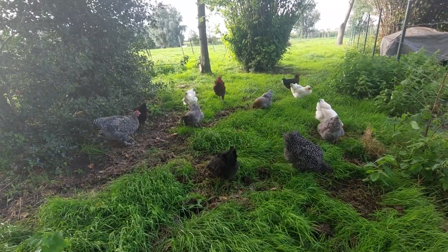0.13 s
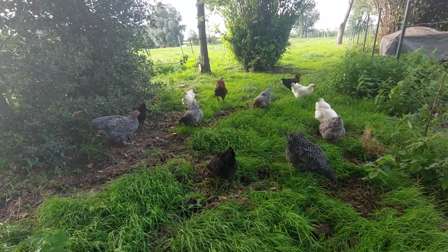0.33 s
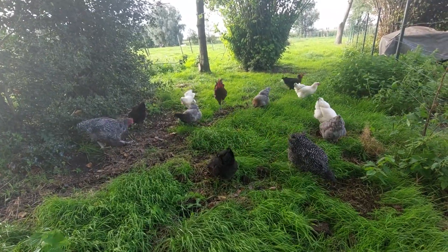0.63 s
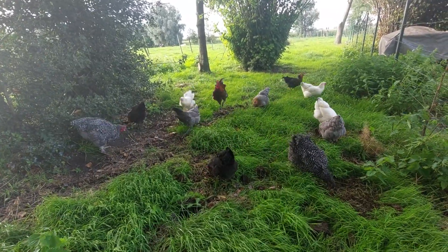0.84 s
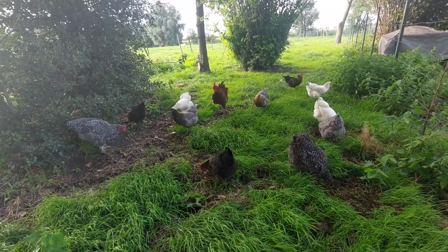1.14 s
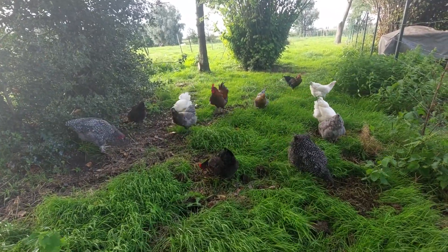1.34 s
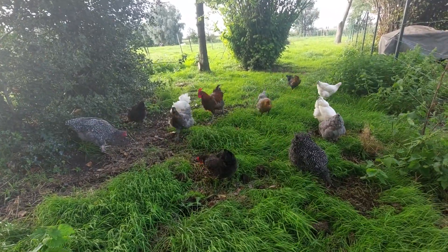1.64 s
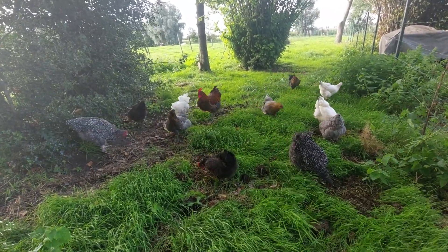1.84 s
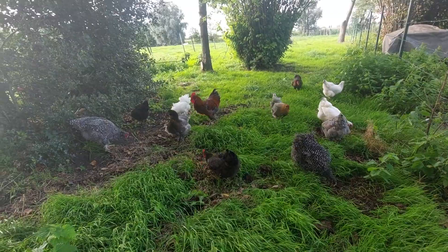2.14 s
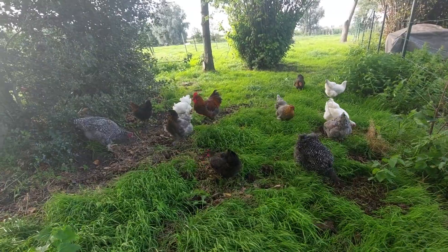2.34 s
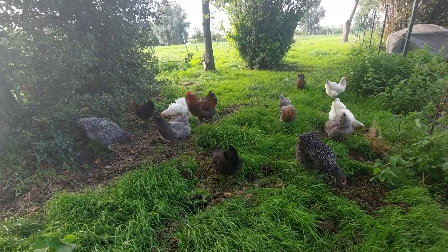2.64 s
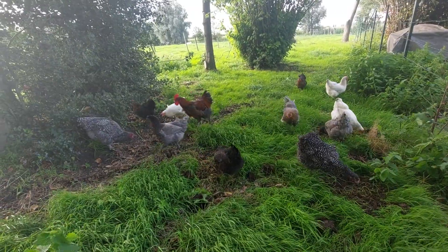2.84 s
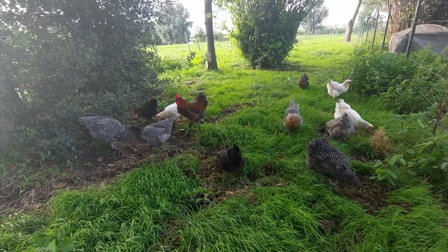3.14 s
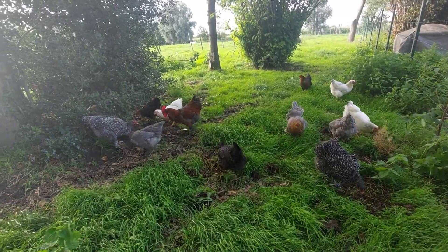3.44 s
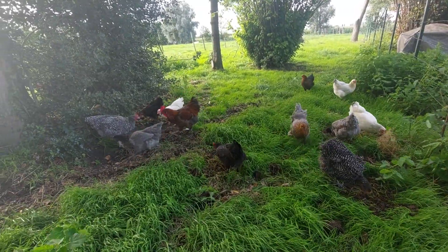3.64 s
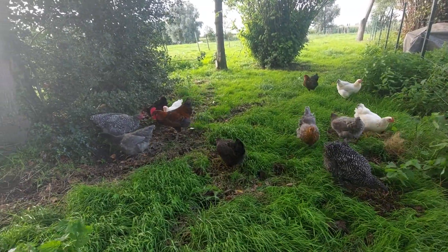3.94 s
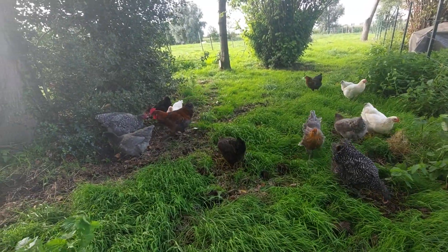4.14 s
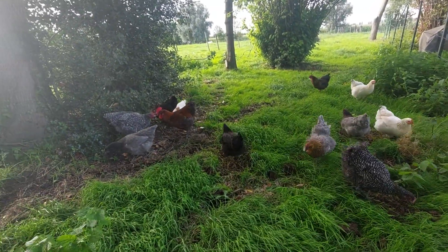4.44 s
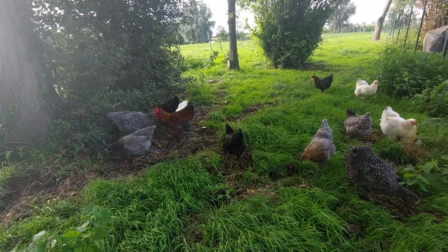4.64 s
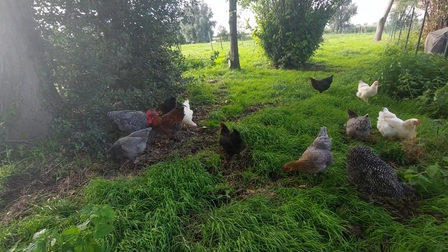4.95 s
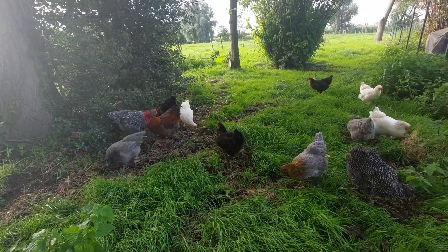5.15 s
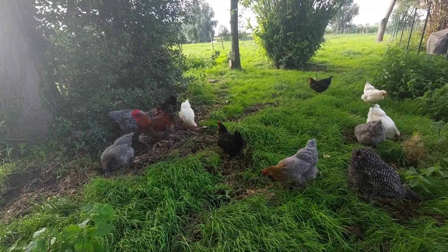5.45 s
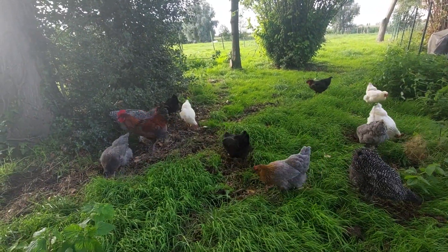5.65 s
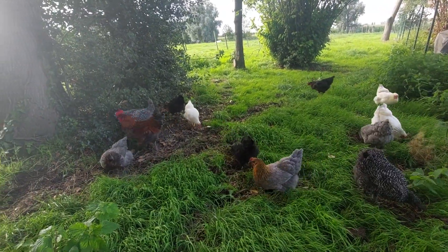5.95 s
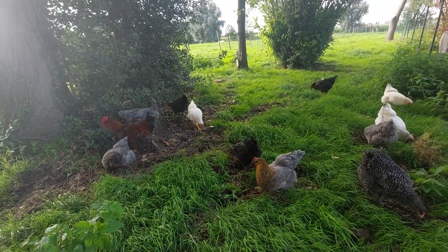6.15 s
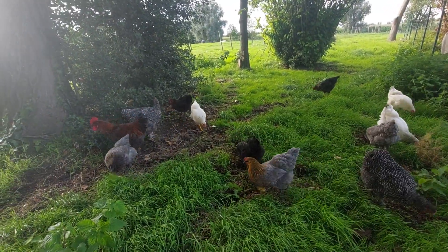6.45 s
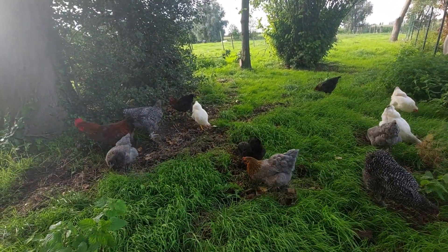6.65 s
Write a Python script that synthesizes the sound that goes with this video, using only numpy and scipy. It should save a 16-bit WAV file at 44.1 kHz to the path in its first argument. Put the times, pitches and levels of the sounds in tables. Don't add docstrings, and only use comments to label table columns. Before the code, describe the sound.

Outdoor chickens: short throaty clucks, soft hen notes, a faint whine and low croon, with dry rustling and bassy wind buffets.

```python
import sys
import numpy as np
from scipy import signal
from scipy.io import wavfile
from scipy.ndimage import uniform_filter1d

SR = 44100
rng = np.random.default_rng(int(sys.argv[2]) if len(sys.argv) > 2 else 0)


def bounce(signal):
    frames = np.transpose(np.atleast_2d(signal))
    limited = np.clip(frames, -1, 1)
    pcm = np.round(limited * 32767).astype(np.int16)
    wavfile.write(sys.argv[1], SR, pcm)


def gain_from_db(level_db):
    decades = np.asarray(level_db, float) / 20
    return 10 ** decades


N = 299350

# freq_hz, density_db (per Hz)
HUM_COLOUR = [(18, -55), (30, -19), (60, 2.5), (87, -33), (155, -15), (194, -38), (243, -11.5), (272, -13),
              (617, -12), (1400, -28.5), (1820, -60), (3080, -120)]
HUM_DB = -62.5
# start_s, level_db
BREEZE = [(0, 2.5), (1, 3), (2, -1), (3, 3.5), (4, -5.5), (4.8, 2.5), (5.7, 1.5), (6.79, 0)]

# freq_hz, density_db (per Hz)
LEAVES_COLOUR = [(760, 2), (1300, -3), (2180, -1), (4670, -1.5), (5810, -4), (7230, -3.5), (8440, -10.5),
                 (9000, -15), (11700, -19), (19800, -120)]
# freq_hz, density_db (per Hz)
GRASS_COLOUR = [(5290, -5), (9000, -5.5), (9940, 0), (11800, 3), (15100, 0), (15800, 1.5)]
# peak_s, length_s, leaves_db, grass_db
SWISHES = [(0.337, 0.11, 2, 3.5), (0.545, 0.078, 3, 3.5), (.76, 0.41, 3.5, 4), (1.103, 0.56, 1, 0.5),
           (2.7, .4, 0.5, 1.5), (3.266, 0.21, 2.5, 3.5), (3.6, .08, 0, 3), (3.703, 0.071, 0, 3.5),
           (4.227, 0.24, 2, 7), (4.366, 0.18, 0.5, 6.5), (4.63, 0.06, 3, 5), (4.755, 0.3297, 1, 4),
           (5.06, 0.17, 0.5, 2.5), (5.23, 0.079, 2.5, 4), (5.58, 0.16, 3, 4), (5.84, .06, -0.5, 3),
           (5.94, .04, 0.5, 6), (6.026, 0.14, 2.5, 7.5), (6.12, 0.033, 1, 5), (6.32, .12, 1, 1.5),
           (6.485, 0.087, 0.5, 2.5), (6.608, 0.1746, 1, 7), (6.775, 0.031, 2.5, 4)]
LEAVES_DB, GRASS_DB = -62.5, -65.5
SETTLE_DB_PER_S = -0.2
LEAVES_PER_DB = 0.06

# start_s, level_db, pan_db (left over right)
WIND = [(0, -53.5, -5), (.12, -59, 11), (.3, -53, -2), (.5, -61, -1), (.67, -49, -3), (.75, -32, -12),
        (.92, -46.5, -2), (1.2, -55.5, -7.5), (1.76, -59, 8.5), (2.12, -48.5, 0.5), (2.55, -42.5, -4.5),
        (2.8, -41.5, -22), (2.89, -48.5, 13.5), (3.3, -37, -2), (4.15, -52, 2.5), (4.4, -67.5, 15),
        (6.2, -70.5, 13), (6.79, -60.5, 3)]
# freq_hz, density_db (per Hz)
WIND_COLOUR = [(12, -50), (25, -23), (55, 3), (130, -2.5), (200, -8), (260, -8.5), (330, -10), (420, -12),
               (600, -41), (1000, -71)]
BRIGHT_DB, DULL_PER_DB = -3, 0.33
# peak_s, peak_db, pitch_hz, pan_db (left over right), length_s
BUFFETS = [(.305, -37.5, 70, -1, .04), (.49, -37.5, 86, 6, .064), (.711, -27.5, 146, 5, .022),
           (.767, -25, 142, -13.5, .033), (.847, -27.5, 235, -1, 0.051), (.941, -44, 122, 17, 0.055),
           (1.051, -31.5, 85, 4, .063), (2.124, -34, 84, -5, 0.029), (2.293, -43, 101, -18, 0.031),
           (2.51, -31, 83, -3, 0.045), (2.69, -36, 98, -13, 0.055), (3.014, -28.5, 127, -5, 0.016),
           (3.06, -26, 95, 0, 0.027), (3.094, -19.5, 92, 0, 0.046), (3.145, -33.5, 229, -9, 0.032),
           (3.19, -28, 212, -10.5, 0.038), (3.236, -18.5, 126, 1, 0.0309), (3.257, -23, 210, 2, 0.023),
           (3.365, -22, 72.3, 1, 0.059), (3.512, -38, 86, -8, .03), (3.664, -34.5, 134, 17, 0.037),
           (3.824, -35, 120, 7.5, 0.033), (3.889, -33.5, 87.5, 2, 0.035), (4.065, -35.5, 101, 0, .079)]
EDDIES_PER_S, EDDY_DB, EDDY_HZ, EDDY_PAN_DB, EDDY_CYCLES = 16, 7, 110, 15, 3.6

# start_s, peak_db, ring_hz
PECKS = [
    (2.384, -47, 2160),
    (2.518, -51, 1400),
    (4.363, -48, 1900),
]
PECK_T60_S = 0.023

# start_s, length_s, pitch_hz, level_db, throat_hz
NOTES = [(1.265, 0.092, 293.3, -57, 835), (1.347, 0.084, 343, -61, 1000), (1.445, 0.028, 317, -62, 920),
         (1.493, 0.04, 298, -54.5, 905), (1.513, 0.036, 346, -53, 740), (1.524, 0.04, 349, -54.5, 1100),
         (1.743, 0.028, 330, -60.5, 1000), (2.789, 0.049, 399, -53, 800), (2.916, 0.066, 419, -50.5, 834),
         (3.062, 0.054, 483, -55, 950), (3.265, 0.084, 484, -54.5, 1006), (3.434, 0.053, 407, -64, 820),
         (3.567, 0.038, 474, -57, 932.1), (5.032, .051, 329, -53.5, 663), (5.126, 0.055, 328, -57, 330),
         (5.186, 0.046, 472, -59, 930), (5.276, 0.06, 366, -55.5, 756), (5.388, 0.03, 388.7, -55, 788),
         (5.436, 0.043, 445, -55.5, 897.7), (5.52, 0.03, 595.5, -53, 580), (5.56, 0.023153, 426, -57, 853),
         (5.594, 0.028, 403, -59, 809), (6.315, 0.048, 476, -62, 990)]
NOTE_RISE = 0.052
# start_s, pitch_hz, second_overtone_db, third_overtone_db
WHINE = [
    (2.594, 449, -61, -57),
    (2.625, 397, -53, -59),
    (2.659, 426, -56, -61),
    (2.72, 445.5, -54.5, -57),
    (2.82, 440, -54, -62.5),
    (2.85, 442.3, -60.5, -81),
    (2.916, 425.6, -60, -80),
]

# start_s, level_db, pulse_rate_hz, throat_hz, beak_open_db
CROON = [
    (4.835, -55.5, 148.7, 733, 6),
    (5.021, -56.5, 133.2, 687, 0),
    (5.16, -50.5, 123.8, 750, 0),
    (5.19, -51.5, 120.9, 490, -8),
    (5.27, -66, 119.7, 420, -16),
    (5.33, -57, 119.5, 426, -17),
    (5.41, -66, 119.1, 438, -17),
    (5.46, -51, 114.7, 458, -12.5),
    (5.63, -56, 109.2, 440, -8),
]
CROON_ROUGH, ROUGH_PER_DB = .47, .014

# strongest_pulse_s, peak_db, throat_hz, pulse_rate_hz, length_s
CLUCKS = [(1.184, -52.5, 880, 193, 0.036), (1.314, -43, 845, 183, .016), (1.598, -39.5, 1005, 314, 0.014),
          (1.736, -43.5, 1130, 258, 0.02), (2.075, -38, 770, 201.4, .024),
          (2.225, -39.5, 830, 197.4, 0.029), (2.383, -37, 833, 213, 0.024), (2.519, -58, 920, 197, .022),
          (3.646, -52.5, 840, 198, 0.027), (3.789, -44, 895, 186, .022), (3.825, -50, 600, 189, 0.014),
          (3.923, -40.5, 764, 193, .025), (4.073, -37.5, 840, 189, 0.025), (4.143, -51.5, 900, 184, 0.015),
          (4.263, -36, 790, 191.6, 0.026), (4.318, -44.5, 910, 193, 0.031),
          (4.452, -38.5, 835, 203.7, 0.028), (4.582, -36.5, 920, 212, .034),
          (4.723, -39.5, 890, 301.4, 0.038)]
# freq_hz, width_hz, level_db
CLUCK_THROAT = [(270, 150, -8), (590, 170, -4.5), (980, 140, -6), (1450, 260, -19)]
SWELL_SHARE = 0.5


def evened(x):
    return x / np.sqrt(np.mean(x ** 2) + 1e-20)


def read(points, hz):
    f, value = np.transpose(points)
    return np.interp(np.log(hz + 1), np.log(f + 1), value, -90, -90)


def curves(rows, t):
    s, *columns = np.transpose(rows)
    return [np.interp(t, s, c) for c in columns]


def sides(pan_db):
    halves = np.array([.5 * pan_db, -.5 * pan_db])
    return gain_from_db(halves.reshape(2, -1))


def add(mix, s, sound):
    part = mix[:, max(round(s * SR), 0):][:, :sound.shape[-1]]
    part += sound[..., :part.shape[1]]


def resonate(x, hz, width):
    turn = np.exp(2j * np.pi * np.cumsum(hz * np.ones(len(x))) / SR)
    r = np.exp(-np.pi * abs(width) / SR)
    return 2 * (turn * signal.lfilter([1 - r], [1, -r], x / turn)).real


def steep(x, hz, width):
    return resonate(resonate(x, hz, width), hz, width)


def noise(colour, same, patchy_db, flicker_db, size, tilt_db=0):
    hop = size // 4
    frames, hz = N // hop + 5, np.fft.rfftfreq(size, 1 / SR)
    a, b, c, d, patches = rng.standard_normal((frames, len(hz), 5)).T
    patches = uniform_filter1d(patches, 5, 0)
    patches = evened(uniform_filter1d(patches, 12, 1))
    flicker = evened(uniform_filter1d(rng.standard_normal((2, 1, frames)), 3))
    same = np.clip(same, 0, 1)
    left = a + 1j * b
    right = same * left + np.sqrt(1 - same ** 2) * (c + 1j * d)
    z = np.array([left, right])
    z *= gain_from_db(read(colour, hz)[:, None] + patchy_db * patches + flicker_db * flicker)
    tilt = np.interp(np.arange(frames) * hop, np.arange(N), tilt_db * np.ones(N))
    z *= gain_from_db(np.outer(hz > 280, tilt))
    return evened(signal.istft(z, nperseg=size, noverlap=size - hop)[1][:, :N])


def far_hum(t):
    level_db = HUM_DB + curves(BREEZE, t)[0]
    return gain_from_db(level_db) * noise(HUM_COLOUR, 0.64, 3.0, 1.0, size=2048)


def swishes(t):
    lift = np.zeros((2, N))
    for s, length, leaves_db, grass_db in SWISHES:
        bump = signal.windows.tukey(round(length * SR), .8)
        add(lift, s - length / 2, np.outer([leaves_db, grass_db], bump))
    return lift + np.array([[LEAVES_DB], [GRASS_DB]]) + SETTLE_DB_PER_S * t


def foliage(t, wind_db):
    leaves_db, grass_db = swishes(t)
    leaves_level = gain_from_db(leaves_db + 4.5 + LEAVES_PER_DB * (wind_db + 49))
    leaves = leaves_level * sides(-1.5) * noise(LEAVES_COLOUR, 0, 0.44, 0.82, size=512)
    grass_pan_db = -2.5 + 0.4884 * (grass_db + 64)
    grass = gain_from_db(grass_db + 3.5) * sides(grass_pan_db) * noise(GRASS_COLOUR, 0, 1.6, 0.7, size=256)
    return leaves + grass


def wind_rumble(wind_db, pan_db):
    bright_db = BRIGHT_DB - DULL_PER_DB * (wind_db + 51.5)
    rumble = noise(WIND_COLOUR, 0.42, 2.1, 4.9, size=1024, tilt_db=bright_db)
    return gain_from_db(wind_db) * sides(pan_db) * rumble


def buffet(db, hz, pan_db, length):
    t = np.arange(round(max(length, .01) * SR)) / SR
    lead = rng.choice([-.13, .13]) * np.array([[1], [-1]])
    wave = np.cos(2 * np.pi * (hz * t + rng.random() + lead))
    eddy_hz = min(1.7 * hz, 260)
    eddy = steep(rng.standard_normal(len(t)), eddy_hz, 214)
    eddy = evened(steep(eddy, eddy_hz, 240))
    return gain_from_db(db) * (wave + 0.2 * eddy) * signal.windows.hann(len(t)) * sides(pan_db)


def gusts(wind_db):
    ports = np.zeros((2, N))
    when, size, pitch, pan = rng.random((round(EDDIES_PER_S * N / SR), 4)).T
    at = (when * (N - 1)).astype(int)
    hz = EDDY_HZ * (pitch + .5)
    pan_db = EDDY_PAN_DB * (2 * pan - 1)
    eddies = zip(at / SR, wind_db[at] + EDDY_DB * size, hz, pan_db, EDDY_CYCLES / hz)
    for s, *row in [*BUFFETS, *eddies]:
        add(ports, s - row[-1] / 2, buffet(*row))
    return ports


def bushes(x):
    t = np.arange(round(.25 * SR)) / SR
    signs = rng.choice([-1., 1.], (2, len(t)))
    taps = signs * (rng.random((2, len(t))) < .04) * (t > .006)
    taps = taps * gain_from_db(-60 * t / .2)
    return signal.fftconvolve(x, taps / np.linalg.norm(taps[0]), axes=1)[:, :N]


def peck(db, hz):
    t = np.arange(round(PECK_T60_S * SR)) / SR
    return gain_from_db(db - 60 * t / PECK_T60_S) * np.sin(2 * np.pi * hz * t)


def syrinx(hz, rough, count, pulse_at=0):
    rough = np.clip(rough, 0, 1)
    wobble = evened(uniform_filter1d(rng.standard_normal(len(hz)), 200))
    turns = np.cumsum(hz * (1 + .12 * rough * wobble)) / SR
    turns = turns - turns[pulse_at]
    pulses = sum(np.cos(2 * np.pi * k * turns) for k in range(1, count))
    air = uniform_filter1d(rng.standard_normal(len(hz)), 12)
    puffs = (.3 + np.exp(-(turns % 1) / .3)) * air
    return (1 - rough) * evened(pulses) + rough * evened(puffs)


def note(length, pitch_hz, db, throat_hz):
    count = round(max(length, .01) * SR)
    hz = pitch_hz * np.linspace(1 - NOTE_RISE / 2, 1 + NOTE_RISE / 2, count)
    drive = syrinx(hz, .27, count=4)
    voice = steep(drive, throat_hz, 170) + gain_from_db(-0.5) * steep(drive, 295, 93)
    return gain_from_db(db) * evened(voice) * signal.windows.tukey(len(hz), .5)


def whine():
    t = np.arange(WHINE[0][0], WHINE[-1][0], 1 / SR)
    hz, second_db, third_db = curves(WHINE, t)
    wobble, flutter = evened(uniform_filter1d(rng.standard_normal((2, len(t))), 400))
    turn = 2 * np.pi * np.cumsum(hz * (1 + .012 * wobble)) / SR
    voice = gain_from_db(second_db) * np.sin(2 * turn) + gain_from_db(third_db) * np.sin(3 * turn)
    breath = evened(steep(rng.standard_normal(len(t)), 2.4 * hz, 700))
    voice = voice + gain_from_db(second_db - 9 - 25 * (t - t[0])) * breath
    return np.sqrt(2) * voice * gain_from_db(2.4 * flutter) * signal.windows.tukey(len(t), .04)


def croon():
    t = np.arange(CROON[0][0], CROON[-1][0], 1 / SR)
    db, hz, throat_hz, open_db = curves(CROON, t)
    drive = syrinx(hz, CROON_ROUGH + ROUGH_PER_DB * open_db, count=9)
    beak = gain_from_db(-5) * steep(drive, 290, 200)
    beak = beak + gain_from_db(-2) * steep(drive, 560, 320)
    beak = beak + gain_from_db(-7) * steep(drive, 870, 200)
    voice = steep(drive, throat_hz, 140) + gain_from_db(open_db) * beak
    voice = voice / np.sqrt(uniform_filter1d(voice ** 2, 1500))
    return gain_from_db(db) * voice * signal.windows.tukey(len(t), .03)


def cluck(db, throat_hz, rate_hz, swell, fade):
    t = np.arange(-swell, fade + 0.0092, 1 / SR)
    moments = [-swell, .001 - swell, -.4 * swell, 0, .6 * fade, fade]
    effort = np.interp(t, moments, [0, .5, .6, 1, .7, 0])
    glide = 1 + .12 * np.clip(t / swell, -1, 1)
    drive = effort * syrinx(rate_hz * glide, .33, count=11, pulse_at=round(swell * SR) - 1)
    opening = 1 + .1 * np.clip(t / swell, -1, 0)
    voice = steep(drive, throat_hz * opening, 210)
    voice = voice + sum(gain_from_db(d) * steep(drive, f, w) for f, w, d in CLUCK_THROAT)
    return gain_from_db(db) * voice / abs(voice).max()


def flock():
    birds = np.zeros((2, N))
    for s, *row in PECKS:
        add(birds, s, peck(*row))
    for s, *row in NOTES:
        add(birds, s, note(*row))
    add(birds, WHINE[0][0], whine())
    add(birds, CROON[0][0], croon())
    for s, *row, length in CLUCKS:
        swell, fade = SWELL_SHARE * length, (1 - SWELL_SHARE) * length
        add(birds, s - swell - .001, cluck(*row, swell, fade))
    birds[1] = gain_from_db(0.7) * np.roll(birds[1], 6)
    return birds


def scene():
    t = np.arange(N) / SR
    wind_db, wind_pan_db = curves(WIND, t)
    backdrop = far_hum(t) + foliage(t, wind_db)
    wind = wind_rumble(wind_db, wind_pan_db) + gusts(wind_db)
    birds = flock()
    echoes = gain_from_db(-10) * bushes(birds)
    return backdrop + wind + echoes + birds


def roll_off(x):
    return signal.sosfilt(signal.butter(12, 16780, fs=SR, output="sos"), x)


def record(dry):
    edge = signal.firwin(1023, 15790, window=("kaiser", 9), fs=SR)
    mix = signal.oaconvolve(dry, edge[None], "same")
    return roll_off(mix)


dry = scene()
out = record(dry)
bounce(out)
```